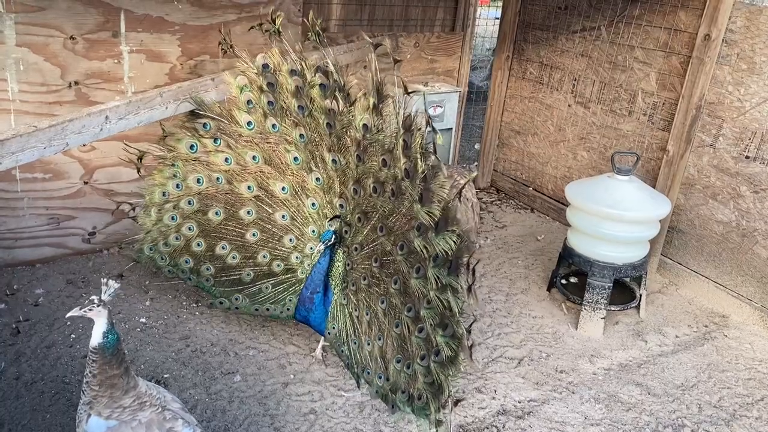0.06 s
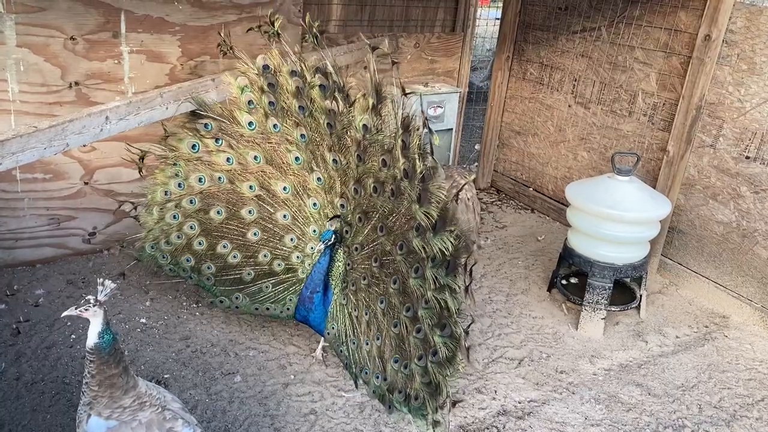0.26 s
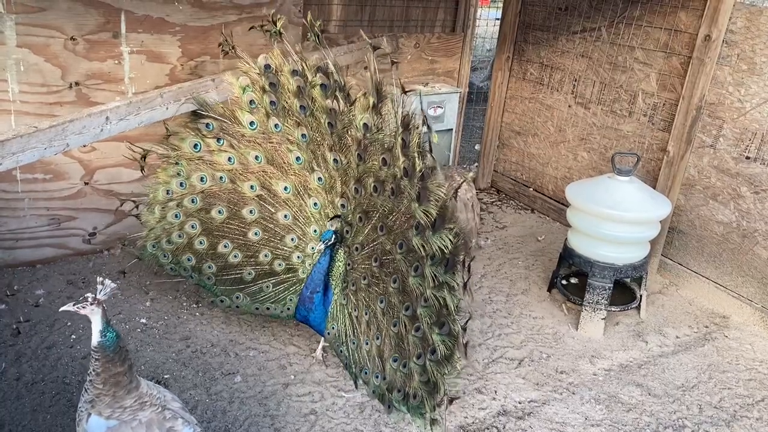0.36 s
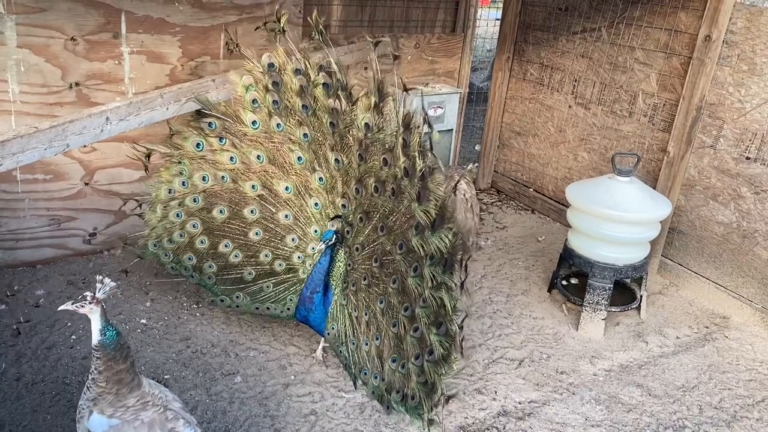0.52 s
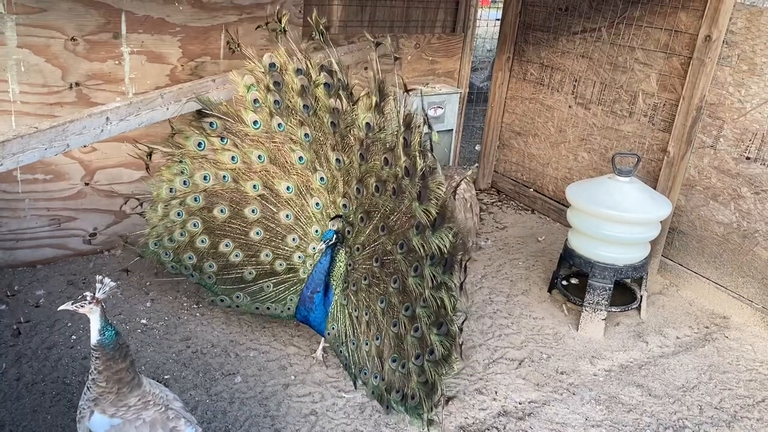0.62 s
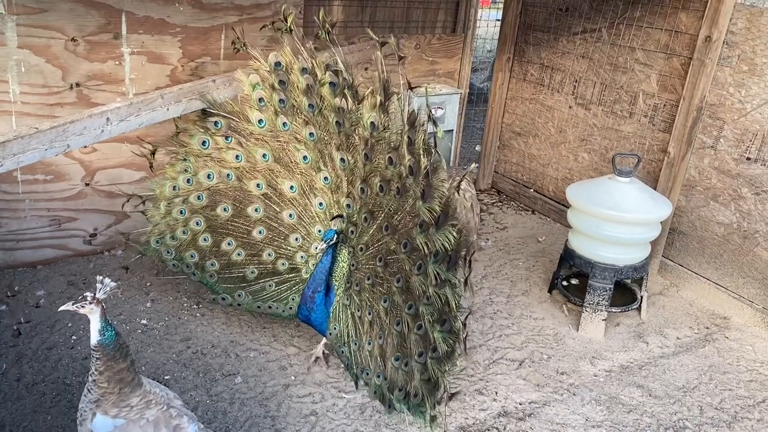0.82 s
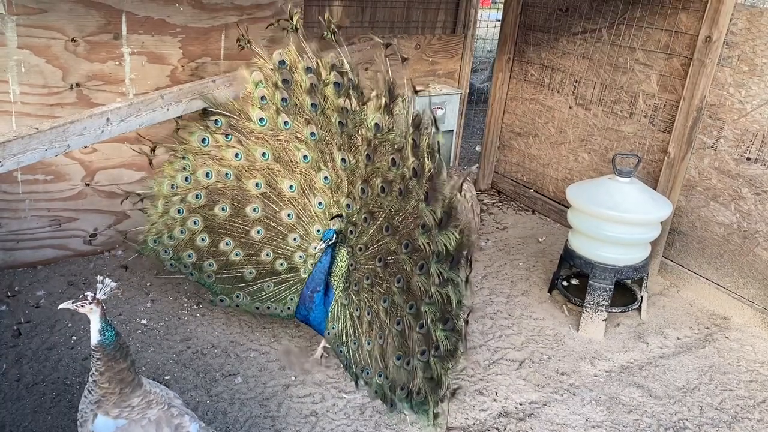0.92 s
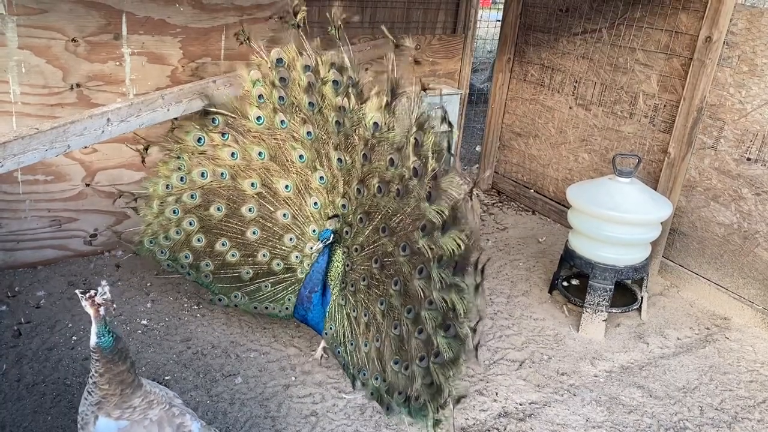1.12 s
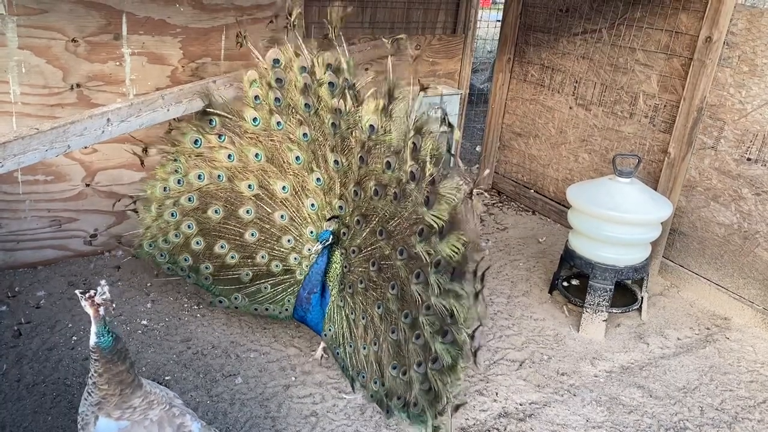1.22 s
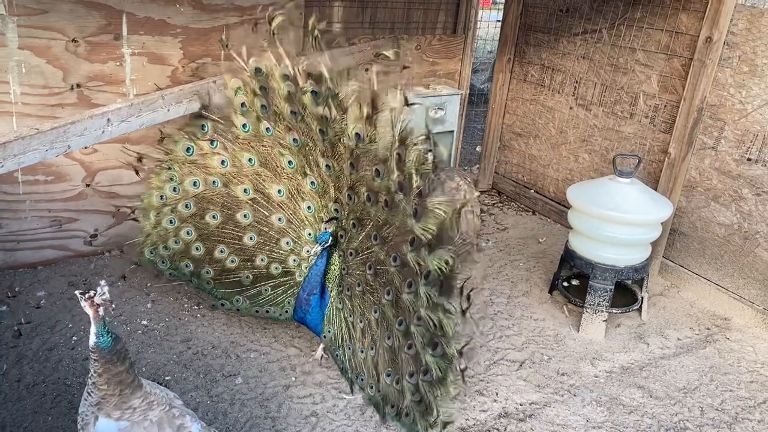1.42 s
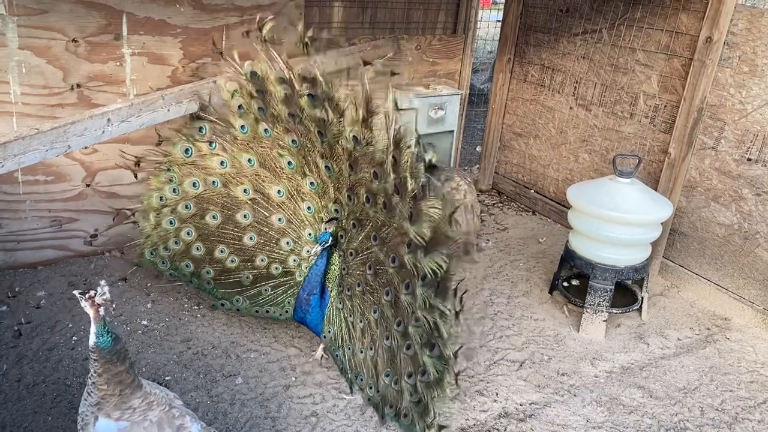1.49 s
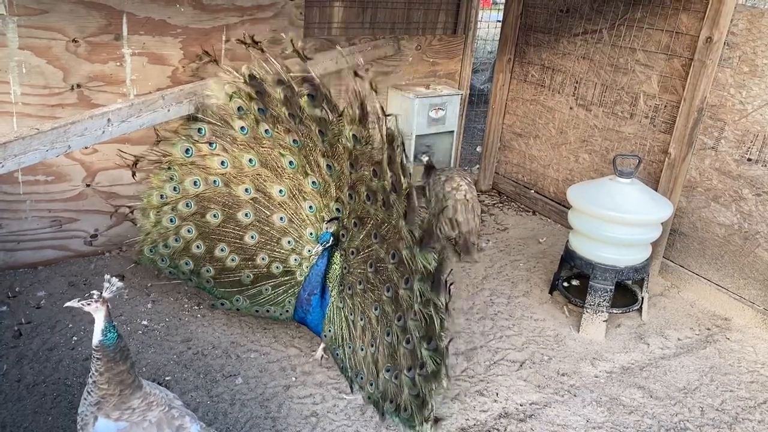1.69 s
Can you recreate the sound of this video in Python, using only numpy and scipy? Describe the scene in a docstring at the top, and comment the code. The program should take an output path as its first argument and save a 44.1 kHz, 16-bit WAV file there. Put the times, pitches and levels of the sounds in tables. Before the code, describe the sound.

A heavy footstep thumps close by at about 0.2 seconds, with gritty clicks and a hollow knock that booms briefly in a wooden pen. Much lighter steps, scuffs and small snaps on dirt follow from 0.5 to 1 second. From about 1 to 1.7 seconds a peacock's spread tail feathers rustle softly, with a faint last bump near the end. Quiet outdoor air lies underneath.

```python
"""Steps and peacock in a plywood pen

A heavy bump close by, like a footfall on gritty dirt, then lighter steps and scuffs.
Weight gives low thuds, struck wood hollow knocks, crushed grit clicks; the walls boom briefly.
A peacock then swings its spread train: sliding feathers rustle softly over quiet outdoor air."""
import sys
import numpy as np
from scipy import signal
from scipy.fft import rfft, irfft, next_fast_len
from scipy.io import wavfile
from scipy.ndimage import uniform_filter1d

SR = 44100
rng = np.random.default_rng(int(sys.argv[2]) if len(sys.argv) > 2 else 0)


def transcribe(u):
    """Save the signal u as a 16-bit wav file named by the first command-line argument.

    u: samples, shape (n,) or (channels, n), limited to [-1, 1]; the rate is SR.
    q: integer samples, one column per channel.
    """
    v = np.clip(np.atleast_2d(u).T, -1, 1)
    q = np.round(v * 32767).astype(np.int16)
    wavfile.write(sys.argv[1], SR, q)


N = 77175
TIME_S = np.arange(N) / SR

# (time [s], level [dB], pitch [Hz], rise [s], t60 [s], left lead [ms])
THUDS = [(0.1903, -7, 132, 0.015, 0.046, 0.46), (.222, -7, 108, 0.0074, 0.054, 0.39),
         (0.2306, -7, 166, 0.002, 0.03, 0.21), (0.287, -32, 184, 0.0041, 0.11, 0.49),
         (.366, -36.5, 91, 0.0097, 0.19, -0.048), (.529, -39, 263.7, 0.0036, .11, 0.46),
         (0.533, -36, 106.6, 0.004, 0.21, .4), (0.7, -39.5, 128, 0.0039, 0.11, -0.44),
         (0.761, -46.5, 77.5, 0.0058, 0.25, -.3), (.988, -40.5, 224, 0.0034, .11, .4),
         (0.996, -30.5, 93, 0.0056, 0.11, 0.55), (1.398, -43, 120, 0.0086, 0.051, 0.23),
         (1.657, -41, 85, 0.0078, 0.077, 0.28)]
# (time [s], level [dB], rise [s], t60 [s], pitch [ratio], left lead [ms])
KNOCKS = [(0.145, -55.5, 0.0015, 0.094, 1, 0.15), (0.187, -30.5, 0.0048, 0.15, 1, 0.4),
          (0.2187, -18.5, 0.0014, 0.085, 1, 0.45), (0.229, -26, 0.0068, 0.083, 1, 0.33),
          (0.524, -41, 0.0056, 0.17, .85, 0.44), (0.618, -48, 0.037, 0.58, 1.03, -0.71),
          (.675, -40, 0.024, 0.2, 1.03, -0.6), (0.762, -51, 0.004, 0.26, .95, -0.6),
          (.977, -41, 0.0043, 0.079, 1.18, 0.23), (1.003, -44, 0.002, 0.057, 1.18, 0.69),
          (1.652, -46.5, 0.0046, 0.078, .5, 0.57)]
# hollow ring at pitch ratio 1: (frequency [Hz], level [dB], t60 [s])
WOOD_MODES = [(85.1, -11, 0.43), (111.86, -3.5, 0.36), (144.2, -0.5, 0.3), (185.4, -3.5, 0.27),
              (263.4, 0, 0.14), (400.4, -11, 0.162), (478, -5.5, 0.11), (670.7, 3, 0.063),
              (749, -10.5, 0.14), (864, -12.5, 0.063), (1661, -11.5, 0.056)]
# clicks and scuffs: (time [s], level [dB], rise [s], t60 [s], tilt [dB/octave], left lead [ms])
GRIT_BURSTS = [(0.1761, -37.5, 0.00061, 0.13, 0, 0.38), (0.187, -32, 0.0016, 0.052, -0.5, 0.54),
               (0.2154, -31, 0.0018, 0.06, -1, 0.49), (.245, -49.5, 0.017, 0.085, -1, 0.42),
               (0.351, -51, 0.0063, 0.2, 3, 0.397), (0.512, -44.5, 0.00033, 0.06, 0, 0.43),
               (0.524, -47.5, 0.0018, 0.059, 0.5, 0.4), (.628, -43, 0.062, 0.27, -3.5, -0.51),
               (.699, -43.5, 0.0016, 0.036, -0.5, -0.446), (.89, -53, 0.013, 0.27, 0.5, 0.38),
               (.974, -43, 0.001, 0.089, -1, 0.56), (0.980, -40, 0.0013, 0.06, 1, 0.5)]
# (time [s], level [dB], pitch [Hz], ring t60 [s], crack over ring [dB])
SNAPS = [(.1752, -36, 2850, 0.05, -0.5), (.1885, -34, 2690, 0.042, 5), (.5119, -39.5, 4020, 0.013, 4.5),
         (.556, -44.5, 5000, 0.012, -19), (.5615, -46, 5050, .01, -12), (.969, -43.5, 4500, 0.015, 7.5),
         (.981, -39.5, 5340, 0.022, 3)]
# three raspy tones, one thin high tone: (time [s], level [dB], pitch [Hz], length [s], width [Hz])
FAINT_TONES = [(-0.04, -70.5, 1467, 0.26, 25), (0.381, -60.5, 1960, 0.068, 715),
               (0.887, -59.5, 1940, 0.084, 190), (0.902, -65.5, 10770, 0.042, 300)]
# direct sound of the steps: (frequency [Hz], left minus right [dB])
STEP_BALANCE = [(100, 0.8), (300, -0.5), (550, 3), (850, 7.5), (1200, -2.5), (3000, 4), (5500, 4.5),
                (7500, -1.5), (14000, 0)]
# wall reverberation: (frequency [Hz], t60 [s])
PEN_DECAY = [(80, 0.29), (200, .4), (600, 0.21), (2000, 0.12), (10000, 0.27)]

# envelopes: (time [s], gain [dB])
TRAIN_SWEEP = [(.9, -63), (1.04, -53.5), (1.16, -46), (1.4, -44.5), (1.55, -50.5), (1.64, -52), (1.7, -63),
               (1.75, -80)]
AIR_SWELL = [(0, -6), (.17, -2), (.45, 1), (.8, 2), (1.55, -7.5), (1.75, -3)]

# noise spectra: (frequency [Hz], relative density [dB])
KNOCK_SPECTRUM = [(60, -49), (200, 4.5), (330, 0.5), (470, 2), (700, 2), (950, -4), (1300, -12.5),
                  (3000, -33), (8000, -44)]
GRIT_SPECTRUM = [(200, -29), (900, 6), (1900, -2), (2800, 3.5), (5000, 0), (7000, -1.5), (8300, -4),
                 (10000, -8.5), (12000, -13), (13500, -12), (16000, -21)]
CRACK_SPECTRUM = [(800, -18), (3000, 2), (9000, 3), (15000, -6)]
FEATHER_SPECTRUM = [(100, -39), (220, -12.5), (430, -6.5), (1000, -3), (1900, -4.5), (2700, -4.5),
                    (5600, -8.5), (8200, -12.5), (10000, -15), (12000, -18.5), (14500, -16.5),
                    (15600, -19.5)]
AIR_SPECTRUM = [(20, 1), (45, 3), (70, 3.5), (140, -4.5), (300, -11), (800, -14.5), (2800, -17.5),
                (6000, -23.5), (9000, -30), (13500, -38), (15500, -30)]
RUMBLE_SPECTRUM = [(20, -27), (50, 3), (75, 8), (120, -8.5), (250, -11.5), (600, -69)]

# left-right likeness: (frequency [Hz], coherence [0..1])
STEP_COHERENCE = [(100, 0.95), (700, 0.75), (2000, 0.94), (6000, 0.089), (9000, 0.062)]
FEATHER_COHERENCE = [(100, 1), (300, 0.86), (640, 0.6), (1400, 0.17), (3100, 0.27), (7000, 0.03),
                     (15000, 0.04)]
AIR_COHERENCE = [(60, 1), (300, 0.78), (1200, 0.037), (8000, 0.033)]


def amp(db):
    """Decibels to gain."""
    return 10 ** (np.asarray(db) / 20)


def unit_rms(x):
    """Scale to rms 1."""
    return x / np.sqrt(np.mean(x ** 2) + 1e-20)


def curve_at(points, hz):
    """Interpolate (frequency [Hz], value) points on a log axis."""
    points_hz, values = np.transpose(points)
    return np.interp(np.log(hz + 1), np.log(points_hz + 1), values)


def filtered(x, response):
    """Apply response(hz) by FFT."""
    size = next_fast_len(N + 8192)
    return irfft(rfft(x, size) * response(np.fft.rfftfreq(size, 1 / SR)), size)[..., :N]


def noise(spectrum, coherence, grain_db=0, tilt_db_oct=0):
    """Stereo noise, rms 1; sub-millisecond grains scatter in level by grain_db."""
    def mid_side_gain(hz):
        angle = np.arccos(np.clip(curve_at(coherence, hz), -1, 1)) / 2
        gain = amp(curve_at(spectrum, hz) + tilt_db_oct * np.log2(hz + 1))
        return gain * [np.cos(angle), np.sin(angle)]

    grains = amp(grain_db * unit_rms(uniform_filter1d(rng.standard_normal(N), size=24)))
    mid, side = filtered(grains * rng.standard_normal((2, N)), mid_side_gain)
    return unit_rms(np.array([mid + side, mid - side]))


def noise_band(centre_hz, width_hz):
    """Mono noise band, rms 1."""
    white = rng.standard_normal(N)
    return unit_rms(filtered(white, lambda hz: 1 / (1 + (2 * (hz - centre_hz) / width_hz) ** 2)))


def strike(start_s, rise_s, t60_s):
    """Envelope: smooth rise, exponential decay."""
    age_s = np.maximum(TIME_S - start_s, 0)
    attack = 1 - np.exp(-(age_s / rise_s) ** 2)
    return attack * np.exp(-np.log(1000) * np.maximum(age_s - rise_s, 0) / t60_s)


def left_lead(x, lead_ms):
    """Stereo delay: left arrives lead_ms before right."""
    return filtered(x, lambda hz: np.exp(1j * np.pi * hz * lead_ms / 1000 * np.array([[1], [-1]])))


def thuds():
    """Weight lands on the ground: a few heavily damped low cycles."""
    out = np.zeros((2, N))
    for start_s, db, hz, rise_s, t60_s, lead_ms in THUDS:
        tone = np.sin(2 * np.pi * hz * (TIME_S - start_s))
        out += left_lead(amp(db) * strike(start_s, rise_s, t60_s) * tone, lead_ms)
    return out


def knocks(ring_db=-4.5, ring_rise_s=0.0078):
    """Contacts clatter and ring the wood; pitch varies with the spot struck."""
    out = np.zeros((2, N))
    for start_s, db, rise_s, t60_s, ratio, lead_ms in KNOCKS:
        ring = np.zeros(N)
        for hz, mode_db, mode_t60_s in WOOD_MODES:
            envelope = amp(mode_db + rng.normal(0, 0.35)) * strike(start_s, ring_rise_s, mode_t60_s)
            ring += envelope * np.sin(2 * np.pi * (ratio * hz * (TIME_S - start_s) + rng.random()))
        spectrum = [(ratio * hz, density_db) for hz, density_db in KNOCK_SPECTRUM]
        clatter = strike(start_s, rise_s, t60_s) * noise(spectrum, STEP_COHERENCE)
        out += left_lead(amp(db) * (clatter + amp(ring_db) * ring), lead_ms)
    return out


def grit():
    """Dry grains crushed and scraped in short bursts."""
    out = np.zeros((2, N))
    for start_s, db, rise_s, t60_s, tilt_db_oct, lead_ms in GRIT_BURSTS:
        crunch = noise(GRIT_SPECTRUM, STEP_COHERENCE, grain_db=3, tilt_db_oct=tilt_db_oct)
        out += left_lead(amp(db) * strike(start_s, rise_s, t60_s) * crunch, lead_ms)
    return out


def snaps(rise_s=0.0001, crack_t60_s=0.0035, lead_ms=0.45):
    """Hard bits snap underfoot: instant crack, brief ring."""
    out = np.zeros((2, N))
    for start_s, db, hz, ring_t60_s, crack_db in SNAPS:
        crack = strike(start_s, rise_s, crack_t60_s) * noise(CRACK_SPECTRUM, STEP_COHERENCE)
        ring = strike(start_s, rise_s, ring_t60_s) * noise_band(hz, width_hz=0.44 * hz)
        out += left_lead(amp(db) * (amp(crack_db) * crack + ring), lead_ms)
    return out


def pen_walls(x):
    """Plywood walls reverberate briefly, longest in the bass."""
    white = noise([(20, 0), (20000, 0)], AIR_COHERENCE)[:, :SR // 2]
    hz, age_s, frames = signal.stft(white, SR, nperseg=256)
    decay = np.exp(-np.log(1000) * age_s / curve_at(PEN_DECAY, hz)[:, None])
    _, tail = signal.istft(frames * decay, SR, nperseg=256)
    return signal.fftconvolve(x, tail / np.linalg.norm(tail[0]), axes=1)[:, :N]


def feathers():
    """Barbs slide over one another, louder as the train swings faster."""
    sweep_db = np.interp(TIME_S, *np.transpose(TRAIN_SWEEP))
    pan_db = np.array([[0.5], [-0.5]])
    return amp(sweep_db + pan_db) * noise(FEATHER_SPECTRUM, FEATHER_COHERENCE, grain_db=1)


def faint_tones():
    """Faint raspy tones and one thin high tone swell and fade."""
    out = np.zeros(N)
    for start_s, db, hz, length_s, width_hz in FAINT_TONES:
        swell = np.sin(np.pi * np.clip((TIME_S - start_s) / length_s, 0, 1))
        out += amp(db) * swell * noise_band(hz, width_hz)
    return out


def outdoor_air(air_db=-55, rumble_db=-56.5, rumble_rise_s=0.25):
    """Quiet air swells and sinks; a low rumble fades in."""
    fade_in = np.clip(TIME_S / rumble_rise_s, 0, 1) ** 2
    rumble = amp(rumble_db) * fade_in * noise(RUMBLE_SPECTRUM, AIR_COHERENCE)
    swell_db = np.interp(TIME_S, *np.transpose(AIR_SWELL))
    return amp(air_db + swell_db) * noise(AIR_SPECTRUM, AIR_COHERENCE) + rumble


def microphone_ports(x, from_hz=7530, in_phase_hz=9970, period_hz=3840):
    """Across the top treble, the two ports alternate in and out of phase with frequency."""
    def mid_side_gain(hz):
        depth = 1 / (1 + (from_hz / (hz + 1)) ** 20)
        ripple = depth * np.cos(2 * np.pi * (hz - in_phase_hz) / period_hz)
        return np.sqrt([1 + ripple, 1 - ripple])

    mid, side = filtered(np.array([x[0] + x[1], x[0] - x[1]]) / 2, mid_side_gain)
    return np.array([mid + side, mid - side])


def scene():
    """Steps mostly left, bird ahead, pen around them."""
    walls_db = -10
    steps = thuds() + knocks() + grit() + snaps()
    direct = filtered(steps, lambda hz: amp(curve_at(STEP_BALANCE, hz) * np.array([[0.5], [-0.5]])))
    return direct + amp(walls_db) * pen_walls(steps) + feathers() + faint_tones() + outdoor_air()


def record(dry):
    """Microphone: stereo treble ripple, low cut, steep band limit."""
    low_cut_hz, top_hz = 52.5, 15500
    low_cut = signal.butter(2, low_cut_hz, 'highpass', fs=SR, output='sos')
    thinned = signal.sosfilt(low_cut, microphone_ports(dry))
    return filtered(thinned, lambda hz: 1 / np.sqrt(1 + (hz / top_hz) ** 120))


dry = scene()
out = record(dry)
transcribe(out)
```